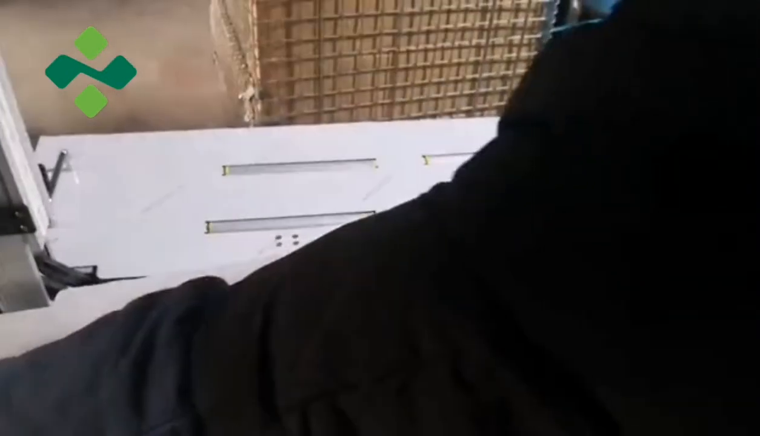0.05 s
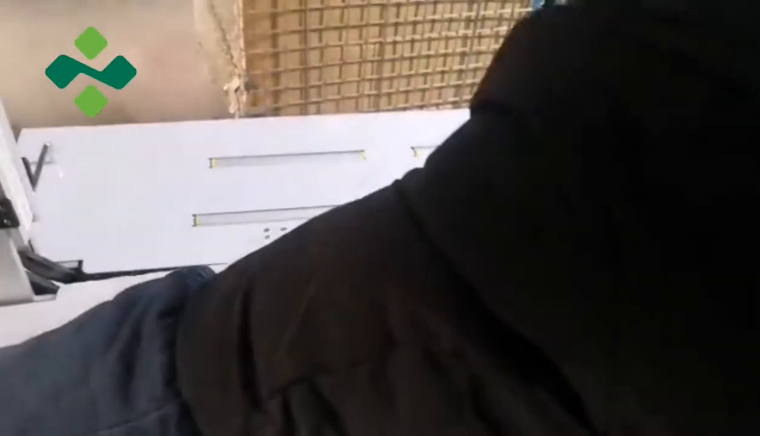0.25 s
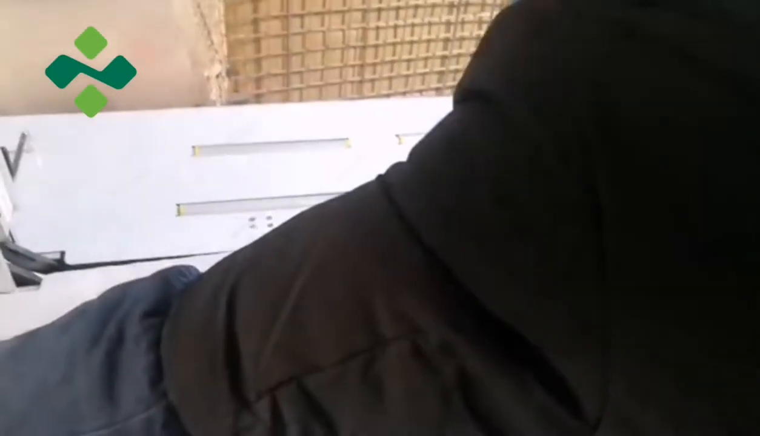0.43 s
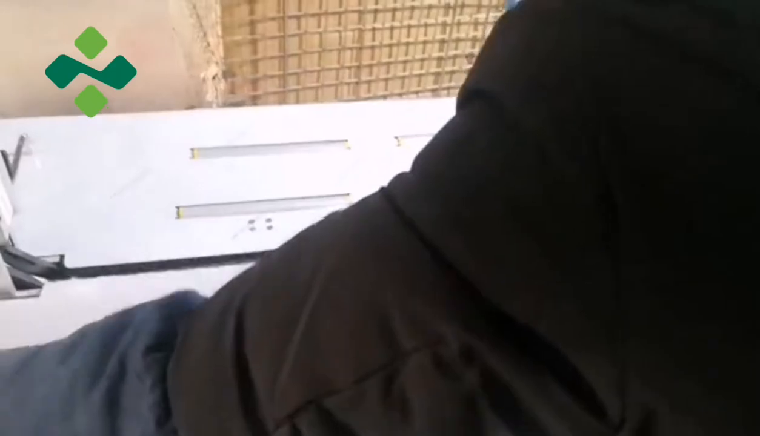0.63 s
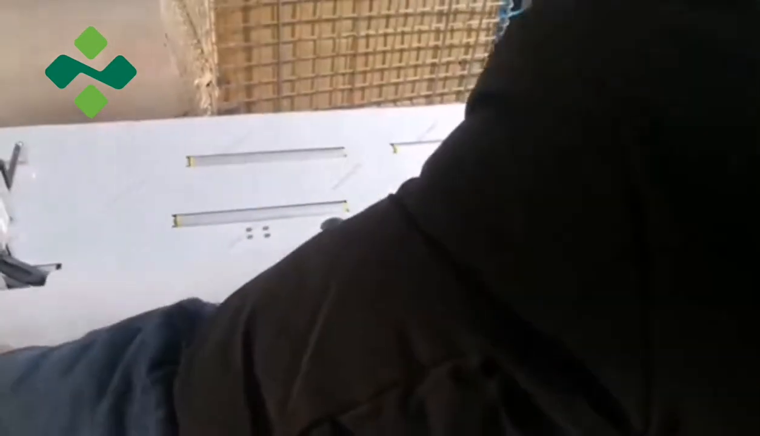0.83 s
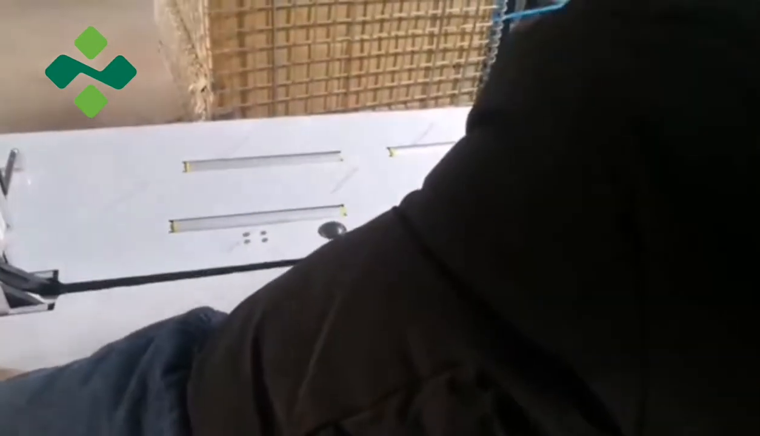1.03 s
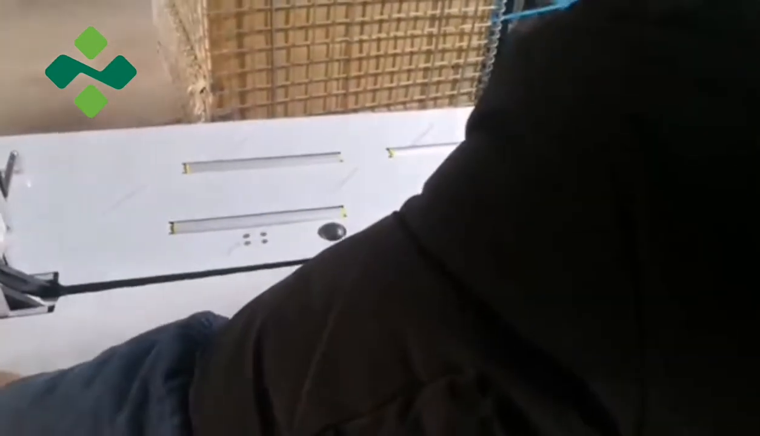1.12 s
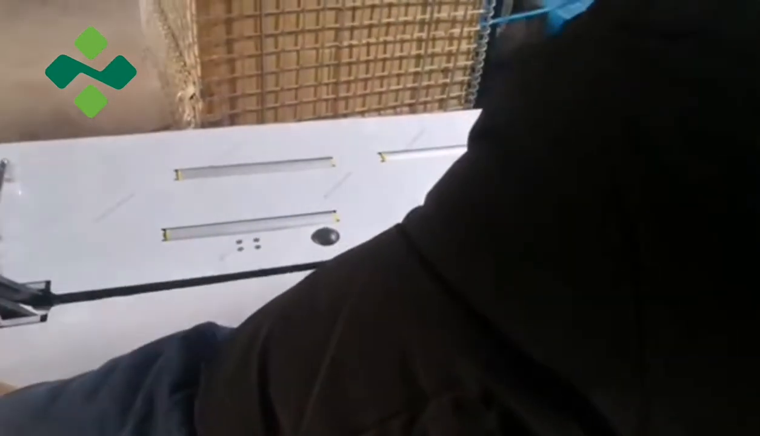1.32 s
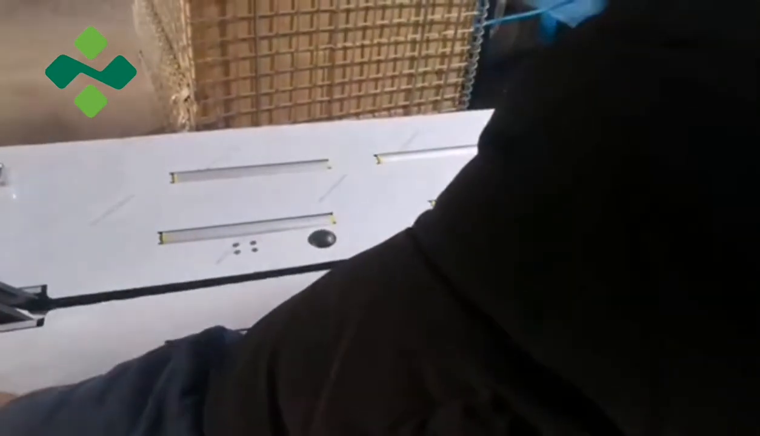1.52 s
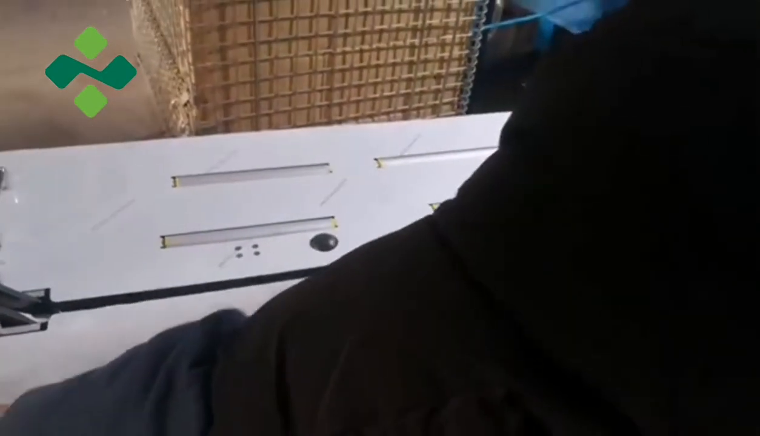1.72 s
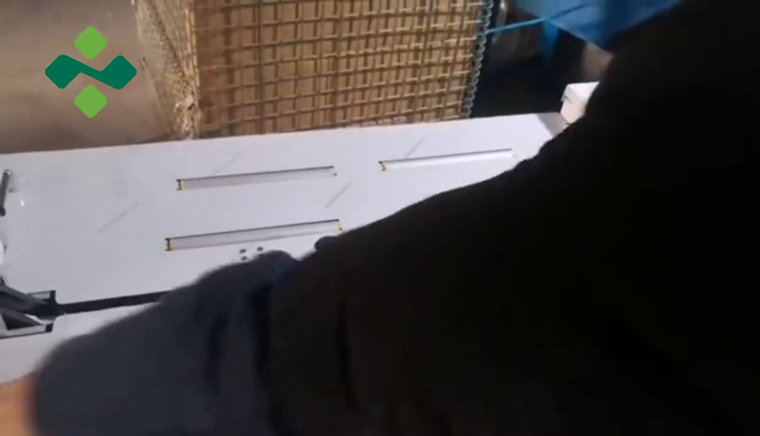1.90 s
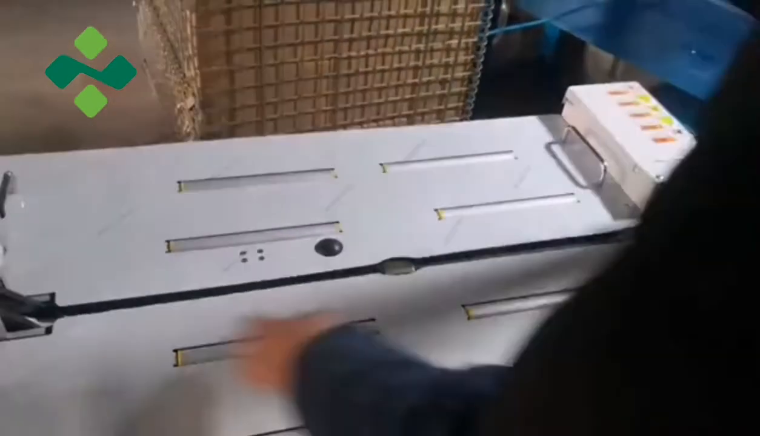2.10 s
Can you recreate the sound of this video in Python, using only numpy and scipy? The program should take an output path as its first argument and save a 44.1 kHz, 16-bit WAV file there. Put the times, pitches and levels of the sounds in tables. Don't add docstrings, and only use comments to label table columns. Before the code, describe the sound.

A strapping machine cycles nearby, left of a phone microphone, over steady low hum, thin drive whine and distant machinery. A sharp gripper clack at 0.23 s leads into raspy, hissing strap feed until 0.6. A softer clack comes at 0.7, then hard ringing jaw blows at 0.96 and 1.14 with cabinet boom and strap squeal. Another squeal precedes release at 1.43; a faint click at 1.7, then hum.

```python
import sys
import numpy as np
from scipy import signal
from scipy.fft import rfft, irfft, next_fast_len
from scipy.io import wavfile
from scipy.ndimage import uniform_filter1d, map_coordinates

SR = 44100
rng = np.random.default_rng(int(sys.argv[2]) if len(sys.argv) > 2 else 0)


def wav_out(sig):
    wavfile.write(sys.argv[1], SR, np.round(np.clip(np.atleast_2d(sig).T, -1, 1) * 32767).astype(np.int16))


def attenuation_scalar(level_db):
    decades = np.asarray(level_db, float) / 20
    return 10 ** decades


N = 94815
FEED_ENDS_S = 0.68


def unit(x):
    return x / np.sqrt(np.mean(x ** 2) + 1e-20)


def along(points, hz):
    f, v = np.transpose(points)
    return np.interp(np.log(hz + 1), np.log(f + 1), v)


def curve(rows):
    s, v = np.transpose(rows)
    return np.interp(np.arange(N) / SR, s, v)


def wobble(rate_hz):
    knots = rng.standard_normal(int(N * rate_hz / SR) + 4)
    return map_coordinates(knots, [np.arange(N) * rate_hz / SR])


def noise_pair():
    return rng.standard_normal((2, N))


def filtered(x, response):
    m = next_fast_len(N + SR // 2)
    return irfft(rfft(x, m) * response(np.fft.rfftfreq(m, 1 / SR)), m)[..., :N]


def tilt(left_over_right_db):
    return attenuation_scalar(np.outer([.5, -.5], left_over_right_db))


def body(peaks):
    def response(f):
        total = 0
        for k, (hz, width_hz, db) in enumerate(peaks):
            damping = 1j * f * width_hz
            total = total + (-1) ** k * attenuation_scalar(db) * damping / (hz * hz - f * f + damping)
        return total
    return response


def frame(count):
    width_hz, level_db = 24, -2
    hz = 600 * 2 ** rng.uniform(0, 3.7, (2, count, 1))
    gain = attenuation_scalar(level_db + rng.normal(0, 2.75, hz.shape)) * rng.choice([-1, 1], hz.shape)
    grid_hz = np.arange(0, SR / 2, 4.0)
    damping = 1j * grid_hz * width_hz
    z = 1 + (gain * damping / (hz * hz - grid_hz * grid_hz + damping)).sum(1)
    return lambda f: np.array([np.interp(f, grid_hz, row) for row in z])


def streaky(x, depth_db):
    z = signal.stft(x, nperseg=1536, noverlap=1152)[2]
    field = uniform_filter1d(rng.standard_normal(z.shape[-2:]), size=5, axis=1)
    z = z * attenuation_scalar(depth_db * np.minimum(unit(field), 1.3))
    return signal.istft(z, nperseg=1536, noverlap=1152)[1][..., :N]


def ports(pair, pan):
    # (frequency [Hz], correlation [-1..1])
    likeness = [(60, 1), (130, 1), (240, 0.88), (500, -0.28), (1000, -0.18), (7000, 0.078)]

    def turn(hz):
        return np.arccos(np.clip(along(likeness, hz), -1, 1)) / 2

    mid, side = filtered(pair, lambda hz: np.array([np.cos(turn(hz)), np.sin(turn(hz))]))
    return filtered(np.array([mid + side, mid - side]), lambda hz: tilt(along(pan, hz)))


def hall():
    # (multiple of whine_hz, level [dB])
    harmonics = [(2, -57.5), (3, -46.5), (4, -48.5), (5, -61), (6, -64)]
    # (time [s], third harmonic [dB], fourth harmonic [dB])
    harmonic_swell = [(0.0, -4.5, -4.5), (0.2, -1, -1.5), (1.5, 0.5, 2), (1.68, -9, 5), (1.78, -6, -2),
                      (1.9, -5, 0), (2.0, 1, 2), (2.15, 0.5, -4.5)]
    # (frequency [Hz], level [dB])
    hum_tones = [(32.3, -57.5), (75.4, -55.5), (96.9, -66)]
    # (frequency [Hz], level [dB])
    far_colour = [(240, -50), (400, -16.5), (1690, -4.5), (2010, -3), (2430, -7.5), (2650, -5.5),
                  (3480, -14.5), (6890, -19.5), (7800, -32), (10100, -83.5), (17200, -120)]
    # (frequency [Hz], level [dB])
    rumble_colour = [(12, -43), (20, -2), (74, -5), (106, -5.5), (145, -11.5), (183, -41), (450, -32.5),
                     (580, -51), (990, -120)]
    # (frequency [Hz], left over right [dB])
    hall_pan = [(70, -0.5), (200, 3), (430, 7), (1150, 4), (3070, 7), (8000, 12.5)]
    whine_hz, far_db, rumble_db = 645.5, -43.5, -48
    t = np.arange(N) / SR
    phase = 2 * np.pi * np.cumsum(whine_hz + .5 * wobble(5.94)) / SR
    s, third_db, fourth_db = np.transpose(harmonic_swell)
    swell_db = {3: np.interp(t, s, third_db), 4: np.interp(t, s, fourth_db)}
    whine = np.zeros((2, N))
    for port in range(2):
        for k, db in harmonics:
            level_db = db + 2 + swell_db.get(k, 0) + 1.2 * wobble(7.4)
            whine[port] += attenuation_scalar(level_db) * np.sin(k * (phase + .3 * port))
    hum = np.zeros(N)
    for hz, db in hum_tones:
        hum += attenuation_scalar(db + 0.5 + 1.4 * wobble(10)) * np.sin(2 * np.pi * hz * t + 0.87 * wobble(13))
    far = unit(filtered(noise_pair(), lambda f: attenuation_scalar(along(far_colour, f))))
    far = far * attenuation_scalar(far_db + 1.1 * wobble(1.3))
    rumble = unit(filtered(noise_pair(), lambda f: attenuation_scalar(along(rumble_colour, f))))
    rumble = rumble * attenuation_scalar(rumble_db + 0.97 * wobble(25))
    return ports(streaky(far, 2.8) + rumble + whine, hall_pan) + hum


def cabinet():
    # (time [s], level [dB])
    load = [(0.0, -45), (0.15, -48), (0.39, -36.5), (0.74, -30), (0.82, -44.5), (0.9, -34.5), (0.93, -43),
            (1.04, -17.5), (1.18, -33.5), (1.33, -36), (1.37, -24.5), (1.59, -42), (2.15, -49)]
    # (frequency [Hz], width [Hz], level [dB])
    panels = [(155.5, 4.4, -4), (207, 21.2, 0.5), (234.4, 22, -3), (266.8, 15.1, 2.5), (319.7, 25, -6),
              (365.3, 20.3, -2.5)]
    # (time [s], level [dB])
    thuds = [(0.42, -27), (0.55, -27), (0.6, -27), (0.715, -27), (1.005, -24), (1.08, -24), (1.16, -27),
             (1.54, -30), (1.032, -12), (1.375, -19)]
    # (time [s], level [dB])
    drone_level = [(0.4, -51), (0.688, -32.5), (0.72, -54.5), (0.968, -59), (1.0, -42), (1.536, -35),
                   (1.748, -45), (1.874, -38.5), (1.9, -50)]
    # (frequency [Hz], width [Hz], level [dB])
    drone_body = [(73, 16, -5.5), (97.6, 20, -2)]
    # (frequency [Hz], left over right [dB])
    near_pan = [(150, -1.2), (400, 1.5), (800, 17.5), (2500, 17.5), (7000, 10.5)]
    shake = unit(filtered(noise_pair() * attenuation_scalar(wobble(30.1)), body(panels)))
    shake = shake * attenuation_scalar(np.minimum(curve(load), -28) - 3)
    knocks, t = np.zeros((2, N)), np.arange(480) / SR
    knock = np.hanning(len(t)) * np.sin(2 * np.pi * 235 * t) * [[1], [.3]]
    for s, db in thuds:
        knocks[:, round(s * SR):][:, :len(t)] += attenuation_scalar(db) * knock
    drone = unit(filtered(rng.standard_normal(N), body(drone_body))) * attenuation_scalar(curve(drone_level) - 3)
    boom = 1.16 * filtered(knocks, body(panels))
    return ports(shake + knocks + boom, near_pan) + drone


def strap():
    # (start [s], rise [s], fall t60 [s], level [dB], hiss [dB])
    strokes = [(0.182, .03, 0.2, -39.5, 14.5), (0.249, 0.022, 1.58, -25, -4), (0.343, 0.024, 0.22, -23, 13),
               (0.373, 0.025, 0.56, -20, -1.5), (0.5, 0.064, 0.28, -29.5, -9), (0.707, 0.012, 0.21, -24, 0),
               (0.735, 0.05, 0.031, -30, 0.5), (0.969, 0.02, 0.88, -24.5, -2),
               (1.019, .04, 0.53, -22.5, -0.5), (1.138, 0.0071, 0.23, -20.5, -2.5),
               (1.21, .05, .4, -45, -27.5), (1.338, 0.0085, 0.29, -27.5, 0), (1.354, 0.026, 0.31, -24, -2),
               (1.44, 0.0041, 0.27, -30.5, -19)]
    # (frequency [Hz], level [dB])
    loose_rasp = [(250, -36), (420, -20), (550, -15), (1060, -7.5), (1850, -4), (2750, 1.5), (4160, -6.5),
                  (4600, -12), (5980, -46.5), (10100, -120)]
    # (frequency [Hz], level [dB])
    tight_rasp = [(250, -41), (420, -14), (488, -14), (881, -10.5), (1760, -13), (1910, -2), (3100, 0),
                  (4500, -18.5), (5980, -40), (10100, -120)]
    # (frequency [Hz], level [dB])
    hiss_colour = [(2350, -42.5), (4000, -1.5), (6180, -1.5), (7190, -0.5), (7680, -6), (8000, -66),
                   (10400, -101), (17600, -120)]
    # (frequency [Hz], width [Hz], level [dB])
    guide = [(1758, 94, -6), (2597, 42, 1.5), (3030, 10, -29.5), (3830, 37, 1.5), (5060, 41, -21),
             (5470, 46, -6), (6200, 19, -15.5), (7800, 26, -11.5), (6900, 32, -4.5)]
    # (frequency [Hz], width [Hz], level [dB])
    release_ring = [(3310, 790, 3.5), (900, 900, 2)]
    slips_per_s, slip_spread_db, slip_t60_s = 2500, 3, .006
    guide_share, hiss_db, release_s, streak_db = .4, -11, 1.3, 8
    t = np.arange(N) / SR
    push, bright = np.zeros(N), np.zeros(N)
    for s, rise_s, t60_s, db, stroke_hiss_db in strokes:
        fall_db = -60 * np.maximum(t - s - rise_s, 0) / t60_s
        shape = np.clip((t - s) / rise_s, 0, 1) ** 2 * attenuation_scalar(db + fall_db)
        push = np.hypot(push, shape)
        bright = np.hypot(bright, shape * attenuation_scalar(stroke_hiss_db))
    slips = (rng.random(N) < slips_per_s / SR) * attenuation_scalar(slip_spread_db * rng.standard_normal(N))
    grain = unit(np.convolve(slips, attenuation_scalar(-60 * t[:400] / slip_t60_s))[:N]) + 1
    noise = grain * attenuation_scalar(wobble(70)) * rng.standard_normal((2, 2, N))
    feeding = t < FEED_ENDS_S
    noise = np.where(feeding, noise, streaky(noise, streak_db) * attenuation_scalar(-2.5))
    ring, steel = body(guide), frame(count=110)

    def rasp(colour):
        metal = lambda f: (1 - guide_share + 2.9 * guide_share * ring(f)) * steel(f)
        return unit(filtered(noise[0], lambda f: attenuation_scalar(along(colour, f)) * metal(f)))

    loose, tight = rasp(loose_rasp), rasp(tight_rasp)
    hiss = filtered(noise[1], lambda f: attenuation_scalar(along(hiss_colour, f)) * (1 + 0.27 * ring(f)) * steel(f))
    hiss = attenuation_scalar(hiss_db) * bright * unit(hiss)
    tight = np.where(t < release_s, tight, filtered(tight, body(release_ring)))
    return attenuation_scalar(1.0) * (push * np.where(feeding, loose, tight) + hiss)


def jaws():
    # (time [s], ring [dB], ring t60 [s], snap frequency [Hz], snap [dB])
    clacks = [
        (0.2298, -14, .2, 1760, -7),
        (0.9582, -17, .1, 1080, -9),
        (1.1353, -22, .1, 2900, -12),
        (1.715, -40, .2, 2800, -45),
        (0.702, -18, .16, 2750, -23),
        (1.427, -17, .13, 3150, -18),
    ]
    # (time [s], frequency [Hz], level [dB], t60 [s])
    taps = [(0.2306, 1790, -5, 0.014), (0.2317, 1780, -7, 0.014), (0.2332, 2800, -17, 0.0085),
            (0.7035, 2820, -18, 0.02), (0.708, 5600, -22, 0.017), (0.7185, 6200, -22.5, 0.013),
            (0.722, 3380, -20, 0.028), (0.9568, 3000, -25.5, 0.013), (0.9583, 1640, -10.5, 0.0067),
            (0.9607, 4700, -7, 0.0061), (0.9604, 1026, -3, .014), (0.9628, 2640, -12.5, 0.0061),
            (0.966, 1100, -14.5, 0.028), (0.972, 2860, -16, 0.032), (0.9765, 2180, -13, .02),
            (1.1358, 3560, -4.5, 0.01), (1.1376, 2980, -2.5, 0.0071), (1.139, 2740, -8, 0.013),
            (1.1455, 2570, -14, 0.017), (1.1515, 2960, -13.5, 0.011), (1.153, 2740, -9, 0.011),
            (1.16, 2490, -12, 0.037), (1.166, 3010, -17, 0.0076), (1.429, 3450, -13.5, 0.033),
            (1.428, 2590, -12.5, .02)]
    # (frequency [Hz], level [dB])
    grip_ring = [(240, -54), (400, -45), (1100, -11.5), (1470, -18), (1720, -2), (2320, -9), (4050, -4.5),
                 (7700, -21.5), (10000, -41.5), (16900, -120)]
    # (frequency [Hz], level [dB])
    steel_ring = [(240, -36), (400, -8.5), (559, -17), (1150, -5.5), (1620, -10), (2720, 0.5),
                  (4690, -19.5), (7700, -22.5), (10000, -44), (16900, -120)]
    crack_db, lift_db, lift_width_oct = 2, 3, 0.87
    out, t = np.zeros((2, N)), np.arange(N) / SR
    steel, short = frame(count=90), t[:2000]
    for s, db, t60_s, snap_hz, snap_db in clacks:
        metal = grip_ring if s < FEED_ENDS_S else steel_ring

        def colour(f):
            octaves = np.log2((f + 1) / snap_hz)
            return attenuation_scalar(along(metal, f) + lift_db * np.exp(-(octaves / lift_width_oct) ** 2))

        late = np.maximum(t - s, 0)
        cloud = unit(filtered(noise_pair(), lambda f: colour(f) * steel(f)))
        out += attenuation_scalar(db - 60 * late / t60_s) * (1 - np.exp(-(late / 0.00094) ** 2)) * cloud
        grit = unit(filtered(noise_pair(), lambda f: attenuation_scalar(0.92 * along(metal, f))))
        crack = attenuation_scalar(snap_db + crack_db - 60 * late / 0.024)
        out += crack * (1 - np.exp(-(late / 0.0027) ** 2)) * grit
    for s, hz, db, t60_s in taps:
        snap = np.sin(2 * np.pi * hz * short + np.array([[0], [1.7]])) * (1 - np.exp(-short / 0.00025))
        out[:, round(s * SR):][:, :len(short)] += attenuation_scalar(db - 60 * short / t60_s) * snap
    return out


def squeal():
    # (start [s], end [s], level [dB])
    spans = [
        (1.006, 1.16, -26.5),
        (1.185, 1.344, -40),
        (1.33, 1.443, -26.5),
    ]
    # (frequency [Hz], width [Hz], level [dB])
    partials_by_span = [
        [(1704, 35, -12), (1897, 68, -2), (2120, 33, -0.5), (2880, 60, -5.5), (3395, 68, -4.5),
         (3653, 39, -5.5), (3903, 29, -11.5), (4220, 32, -19), (4350, 30, -13.5), (5010, 28, -22),
         (5760, 44, -14), (5760, 35, -12), (7040, 43, -10), (7470, 64, -6)],
        [(1037, 24, -11), (1232, 50, -7), (2060, 130, -14.5), (2630, 100, -2.5), (2800, 46, 0),
         (3250, 32, -8.5), (3500, 33, -8), (3160, 20, -15.5)],
        [(2350, 21, -6), (2610, 95, 2), (2784, 110, -2.5), (3150, 64, -22), (3280, 18, -10.5), (3430, 39, -7.5),
         (3680, 160, -8)],
    ]
    edge_s, waver_db, waver_share, far_port_db = .05, 7, .25, -3
    t, out = np.arange(N) / SR, np.zeros((2, N))
    for (start, end, level_db), partials in zip(spans, partials_by_span):
        gate = np.clip(np.minimum(t - start, 0.44 * (end - t)) / edge_s, 0, 1)
        for hz, width_hz, db in partials:
            phase = 2 * np.pi * np.cumsum(hz + waver_share * width_hz * wobble(40)) / SR
            swell_db = waver_db * np.minimum([wobble(28.11), wobble(40)], .8) + [[0], [far_port_db]]
            tone = np.sin(phase + rng.uniform(0, 2 * np.pi, (2, 1)))
            out += gate * attenuation_scalar(level_db + db + swell_db) * tone
    return out


def room(x):
    # (frequency [Hz], t60 [s])
    decay = [(200, 1), (2000, 0.31), (7000, 0.15)]
    room_db = -11.5
    hz, t, z = signal.stft(rng.standard_normal((2, SR // 2)), SR, nperseg=256)
    fading = z * attenuation_scalar(-60 * t / along(decay, hz)[:, None])
    tail = signal.istft(fading, SR, nperseg=256)[1]
    tail = np.pad(tail, ((0, 0), (300, 0))) / np.linalg.norm(tail[0])
    answer = signal.fftconvolve(x.mean(0)[None], tail, axes=1)[:, :N]
    return x + attenuation_scalar(room_db) * attenuation_scalar([[3], [-3]]) * streaky(answer, 4.1)


def scene():
    # (time [s], left over right [dB])
    strap_pan = [(0.2, 8), (0.66, 5.5), (0.7, 12.5), (0.97, 11.5), (1.05, 15.5), (1.2, 7), (1.35, 12),
                 (1.5, 13)]
    # (frequency [Hz], left over right [dB])
    shadow = [(300, -3), (900, -4), (2700, 1.5), (7500, 5)]
    near = (strap() + jaws() + squeal()) * tilt(curve(strap_pan))
    near = filtered(near, lambda hz: tilt(along(shadow, hz)))
    return room(near) + cabinet() + hall()


def low_pass(x):
    return signal.sosfilt(signal.butter(12, 8820, fs=SR, output="sos"), x)


def record(dry):
    top_hz, spill_hz, spill_db = 7670, 8600, -24.5
    x = filtered(dry, lambda hz: 1 / (1 + (hz / top_hz) ** 60) + attenuation_scalar(spill_db) * (hz < spill_hz))
    return low_pass(np.clip(x, -1, 1))


dry = scene()
out = record(dry)
wav_out(out)
```